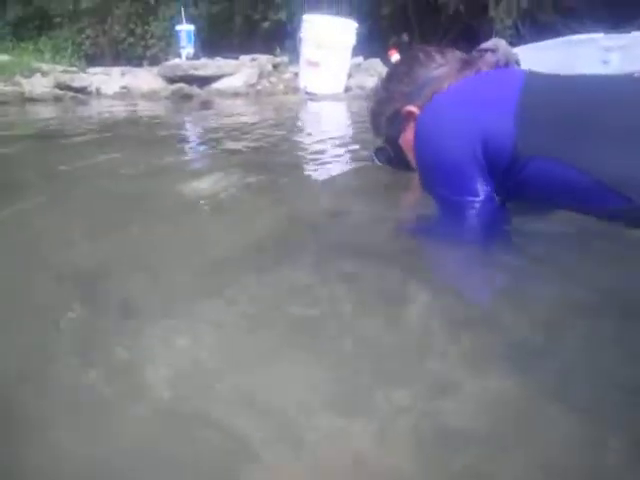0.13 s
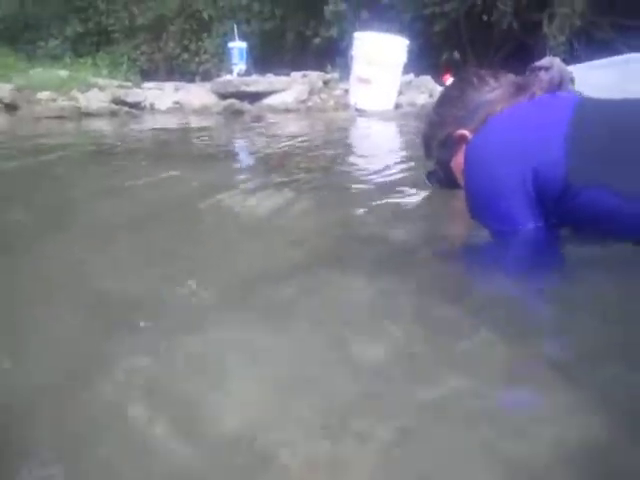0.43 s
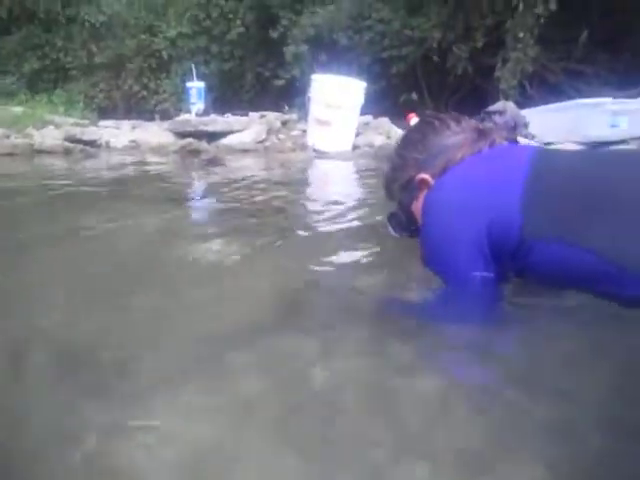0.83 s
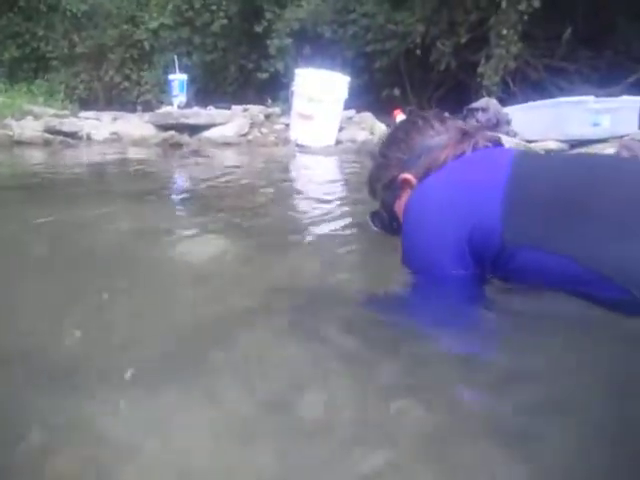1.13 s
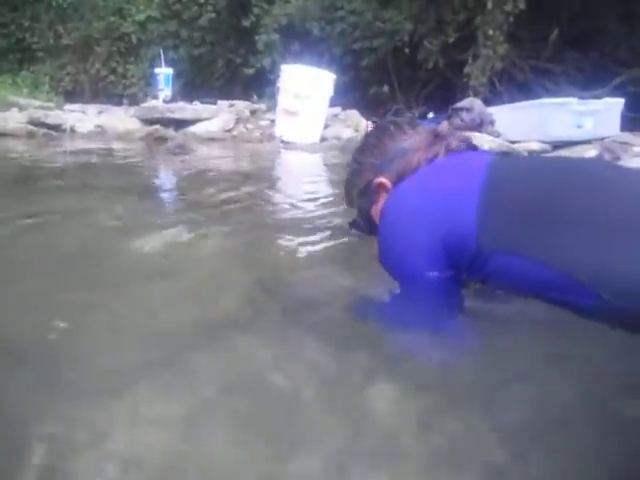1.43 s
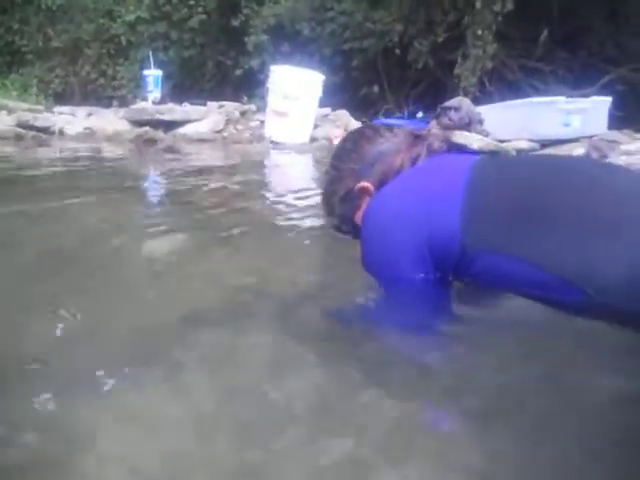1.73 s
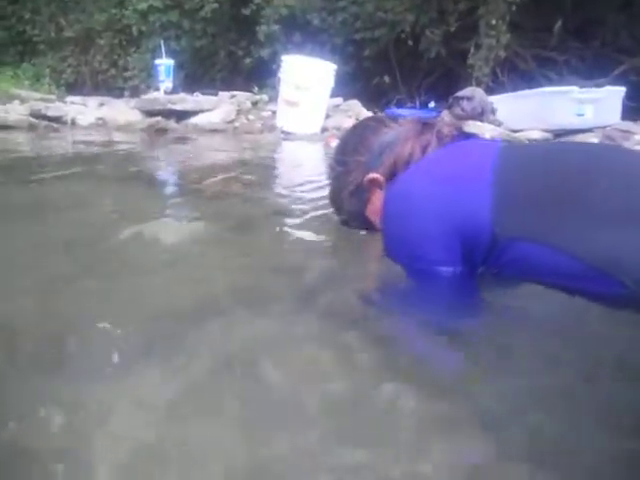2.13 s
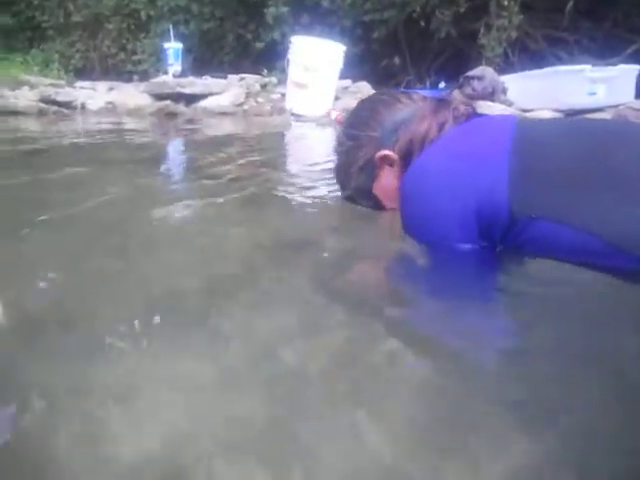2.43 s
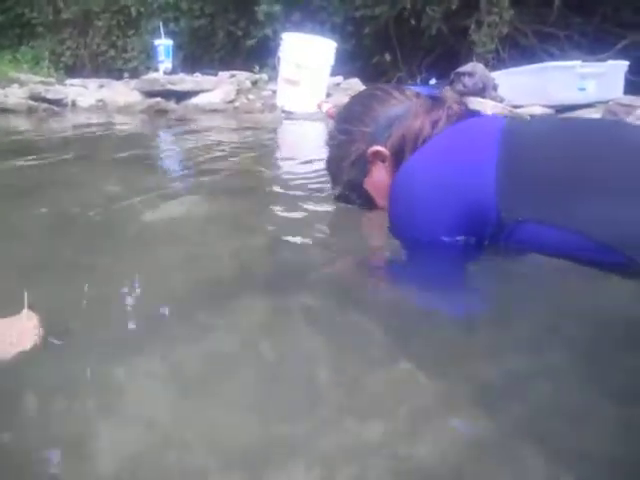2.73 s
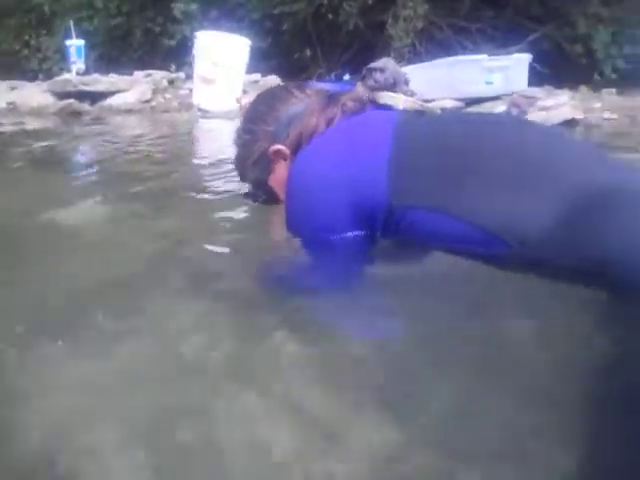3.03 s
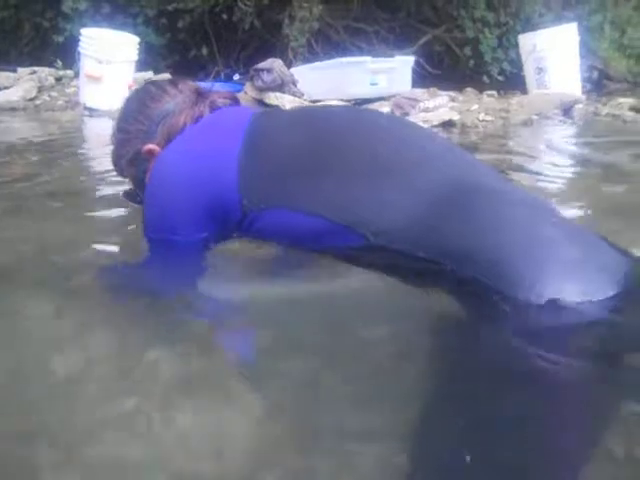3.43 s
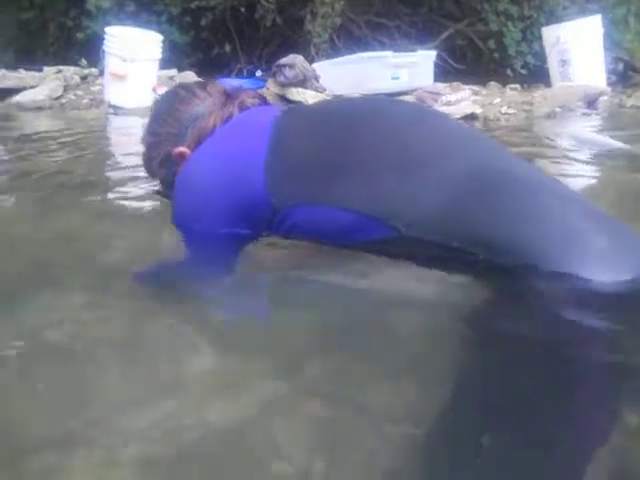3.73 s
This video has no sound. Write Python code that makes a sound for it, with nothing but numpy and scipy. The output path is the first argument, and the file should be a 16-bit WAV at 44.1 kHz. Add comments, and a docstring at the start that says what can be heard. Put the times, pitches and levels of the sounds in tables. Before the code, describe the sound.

Low rapid engine buzz with a metallic rattle grows from distant to strong outdoors. Wind buffets and little water blips cover the opening, then fade; dull, narrow-band microphone sound with one faint click near the end.

```python
"""A small one-cylinder dredge engine on a river bank, growing from faint to loud, is the main source.
Each turn excites the exhaust resonances with one pulse and modulates gas and casing noise;
damped sines ring once a turn, and the speed sags briefly now and then.
Wind adds filtered rumble and short pressure swings, most at the start.
Shallow water adds a few gulps of rising pitch and plips of decaying tone with a tick of spray."""
import sys
import numpy as np
from scipy import signal
from scipy.fft import rfft, irfft
from scipy.io import wavfile

SR = 44100
rng = np.random.default_rng(int(sys.argv[2]) if len(sys.argv) > 2 else 0)


def int16_out(signal):
    """Quantize to a 16-bit WAV file."""
    q = np.round(np.clip(np.atleast_2d(signal).T, -1, 1) * 32767)
    wavfile.write(sys.argv[1], SR, q.astype(np.int16))


N = 170667  # length [samples]

# Spectra below give a shape only: colour() brings the filtered sound to rms 1.
# Wind rumble gain: (time [s], level [dB])
WIND_LEVEL = [(0, -16.5), (.33, -18.5), (.52, -21), (.62, -25), (.86, -25.5), (1.15, -28), (1.7, -30),
              (2.3, -30.5), (2.47, -27), (2.65, -27.5), (3.3, -24.5), (3.87, -26)]
# Wind rumble spectrum: (frequency [Hz], relative density [dB per Hz])
RUMBLE_SPECTRUM = [(4, -9.5), (10, -2.5), (20, -9), (32, -15.5), (45, -14.5), (65, -24.5), (100, -30.5),
                   (200, -43.5), (400, -62), (2000, -100)]
# Separate buffets of wind: (centre time [s], length [s], peak level [dB])
WIND_BUFFETS = [(.04, 0.047, -10.5), (0.128, 0.048, -14), (0.161, 0.031, -15), (0.261, .06, -8),
                (0.321, 0.041, -10), (0.381, 0.033, -13), (0.554, .045, -20.5), (0.853, 0.054, -13),
                (1.034, .04, -20), (2.449, 0.065, -18)]
FLUTTER_DB = -35  # hiss level against its buffet [dB]
CHOKE = 0.45  # wind pressure that halves the engine sound [full scale]

# Low gulps of water: (start time [s], start frequency [Hz], length [s], peak level of the tone [dB])
WATER_GULPS = [(.218, 120.1, .042, -28.5), (.358, 85.1, 0.048, -27), (.448, 79, 0.02806, -24),
               (.72, 65, 0.027, -27.5), (1.335, 79, 0.025, -33)]
GULP_RISE, GULP_SLOSH = 0.82, 0.41  # glide over one gulp [octaves]; churning noise [rms per unit tone]
# Plips at the surface:
# (start time [s], frequency [Hz], t60 [s], peak level of the tone [dB], spray [rms per unit tone])
WATER_PLIPS = [(.104, 560, 0.025, -28, .9), (.874, 1300, .06, -34, 1.6), (1.015, 495, .1, -28, .1)]

# Brief sags of the engine speed: (centre time [s], depth [Hz])
SPEED_SAGS = [(.65, 1.3), (1.29, .5), (1.9, .4), (2.39, .5), (2.999, .53), (3.751, .63)]
TURN_HZ, SAG_S = 43.88, .05  # steady speed [turns/s]; standard deviation of a sag [s]
PUFF_AT_S = 2.4144  # time at which a turn begins with its puff [s]
WAVER_DB, WAVER_HZ = 0.28, 6  # spread of the engine level [dB]; rate, two new values a cycle [Hz]
# Gain of the engine parts: (time [s], exhaust level [dB], casing level [dB], clatter level [dB])
ENGINE_SWELL = [(0, -39.5, -47, -56.5), (.5, -40.5, -50, -56), (.8, -35, -43.5, -53.5),
                (1.15, -32.5, -41, -51), (1.5, -29.5, -37, -46.5), (1.8, -28, -34.5, -42.5),
                (2.15, -24.5, -31.5, -40), (2.6, -22.5, -28, -39.5), (3.15, -20.5, -28.5, -35.5),
                (3.87, -20.5, -27, -35.5)]

# Casing noise spectrum: (frequency [Hz], relative density [dB per Hz])
CASING_SPECTRUM = [(500, -24.5), (700, -9), (800, -2.5), (1000, -3), (1250, -2.5), (1420, 1.5),
                   (1560, -2.5), (1700, -11), (1900, -13.5), (2600, -45)]
# Clatter noise spectrum: (frequency [Hz], relative density [dB per Hz])
CLATTER_SPECTRUM = [(600, -49.5), (1300, -26.5), (1750, 1), (1900, -0.5), (2300, 0.5), (2550, -1.5),
                    (2900, -0.4), (3150, 0.5), (3400, -3.5), (3750, -2.5), (4000, -10.5), (4400, -23)]
# Levels before the swell [dB]; weight of noise power that repeats every turn [0..1]
CASING_DB, CASING_REPEAT = -1.03, 0.051
CLATTER_DB, CLATTER_REPEAT = -1.22, .16
# Valve gear ringing once a turn:
# (place in the turn [turns], ring frequency [Hz], t60 [s], rms level before the swell [dB])
VALVE_KNOCKS = [(.1, 1052, 0.06, -14.5), (.1, 1229, .06, -15), (.9, 1320, 0.062, -16),
                (.9, 1405, 0.069, -7), (.9, 1485, 0.052, -14), (0.72, 1755, 0.071, -19),
                (0.7, 2090, .04, -20), (.78, 2320, 0.038, -17.5), (.26, 2895, 0.023, -21.5)]
KNOCK_SCATTER_DB, KNOCK_JITTER_S = 2, .00005  # spread of size [dB] and of time [s]

# Exhaust resonance curve, first row not used: (multiple of the turn rate [1], relative level [dB])
EXHAUST_TONE = [(1, -10), (2, -7), (3, -10), (4, -14.5), (5, 2.5), (6, 0), (7, -7.5), (8, -6.5), (9, -5),
                (10, -6.5), (11, -3.5), (12, -3), (13, -6), (14, -12), (15, -13.5), (16, -7.5), (17, -36),
                (18, -21)]
PUFF_SCATTER_DB, PUFF_JITTER_S = 0.03, .00005  # spread of size [dB] and of time [s]
BOUNCE_S, BOUNCE_SHARE = .00835, 0.41  # round trip of a bounce [s]; amplitude kept each time [0..1]
# Gas rush spectrum: (frequency [Hz], relative density [dB per Hz])
GAS_SPECTRUM = [(60, -15.5), (150, -18.5), (230, -0.5), (350, -0.5), (500, 4), (620, 2.5), (700, 1),
                (780, -3.5), (1100, -45)]
EXHAUST_DB, GAS_DB = 1.47, -13  # puffs and gas before the swell [dB]

TOP_HZ = 4400  # upper band edge of the recorder [Hz]
# One tiny electrical click: start [s], level before the last low-pass [dB], decay constant [s]
CLICK_S, CLICK_DB, CLICK_DECAY_S = 3.387, -19.5, .0002
CLICK_TOP_HZ = 15800  # upper band edge after the click [Hz]


def undb(db):
    """Amplitude ratio from a level: twenty decibels make a factor of ten."""
    return 10 ** (np.asarray(db) / 20)


def unit(x):
    """Normalisation of the root mean square to 1."""
    return x / np.sqrt(np.mean(x ** 2) + 1e-18)


def curve(table, axis=1):
    """Gain envelope: linear interpolation of level in decibels over time."""
    rows = np.array(table)
    return undb(np.interp(np.arange(N) / SR, rows[:, 0], rows[:, axis]))


def colour(x, points):
    """Minimum-phase filtering: folding the cepstrum of the log gain makes it causal; output rms 1."""
    size = 2 * N
    hz, db = np.array(points, float).T
    log_hz = np.log(np.arange(N + 1) * SR / size + 1e-9)
    log_gain = np.log(undb(np.interp(log_hz, np.log(hz), db)))
    cepstrum = irfft(log_gain)
    cepstrum[1:N] *= 2
    cepstrum[N + 1:] = 0
    response = np.exp(rfft(cepstrum))
    led_in = np.concatenate([x[::-1], x])  # a mirrored lead-in lets the filter settle
    return unit(irfft(rfft(led_in) * response)[N:])


def add(out, start_s, sound):
    """Superposition: a short sound is summed in at its start time."""
    i = max(int(start_s * SR), 0)
    out[i:i + len(sound)] += sound[:N - i]


def damped_sine(t, hz, t60):
    """Free vibration of a damped resonator: it falls by 60 dB in t60."""
    return np.sin(2 * np.pi * hz * t) * np.exp(-np.log(1000) * t / t60)


def pulses(turns, share, scatter_db, jitter_s):
    """Quasi-periodic excitation: one impulse a turn, each a little off in size and time."""
    marks = np.arange(np.ceil(turns[0] - share), turns[-1] - share) + share
    size, late = rng.standard_normal((N // 100, 2))[:len(marks)].T
    at = np.clip(np.interp(marks, turns, np.arange(N)) + late * jitter_s * SR, 0, N - 2)
    out, i = np.zeros(N), at.astype(int)
    gain = undb(scatter_db * size)
    # two neighbouring samples share an impulse that falls between them
    out[i] += gain * (1 - at % 1)
    out[i + 1] += gain * (at % 1)
    return out


def rattle(turns, repeat, peak_at, depth):
    """Cyclic amplitude modulation of noise, part of which repeats from turn to turn."""
    size = 1024  # points in the repeated pattern of one turn
    pattern = np.interp(turns % 1 * size, np.arange(size), rng.standard_normal(size))
    noise = np.sqrt(repeat) * pattern + np.sqrt(1 - repeat) * rng.standard_normal(N)
    return noise * np.exp(depth * np.cos(2 * np.pi * (turns - peak_at)))


def wind():
    """Pressure fluctuation on a microphone: deep noise, plus single swings that carry a faint hiss."""
    out = colour(rng.standard_normal(N), RUMBLE_SPECTRUM) * curve(WIND_LEVEL)
    hiss = colour(rng.standard_normal(N), [(300, -4), (3500, 0), (4500, -14.5)])
    t = np.arange(N) / SR
    for at, length, db in WIND_BUFFETS:
        u = (t - at) / length
        out += undb(db) * np.exp(-(2 * u) ** 2) * np.cos(2 * np.pi * u)
        out += undb(db + FLUTTER_DB) * np.exp(-(np.pi * u) ** 2) * hiss
    return out


def gulps():
    """Rising resonance: each gulp is a tone gliding upward, mixed with churning noise."""
    out = np.zeros(N)
    slosh_spectrum = [(30, -6.5), (90, 0), (220, -5.5), (400, -21.5), (1500, -56)]
    slosh = colour(rng.standard_normal(N), slosh_spectrum)
    for at, hz, length, db in WATER_GULPS:
        age = np.linspace(0, 1, int(length * SR))  # 0 at the start, 1 at the end
        phase = 2 * np.pi * np.cumsum(hz * 2 ** (GULP_RISE * age)) / SR
        gulp = np.sin(phase) + GULP_SLOSH * slosh[int(at * SR):][:len(age)]
        add(out, at, undb(db) * np.sin(np.pi * age) * gulp)
    return out


def plips():
    """Damped resonance: each plip is a decaying tone with a shorter tick of spray noise."""
    out = np.zeros(N)
    t = np.arange(SR // 5) / SR
    spray = colour(rng.standard_normal(N), [(200, -6), (600, 2), (1800, 6), (4000, -27)])
    for at, hz, t60, db, share in WATER_PLIPS:
        tick = share * spray[int(at * SR):][:len(t)] * np.exp(-t / .012)
        tick = tick * np.exp(-np.log(1000) * t / t60)
        add(out, at, undb(db) * (damped_sine(t, hz, t60) + tick))
    return out


def crank():
    """Rotation angle as the integral of speed: a steady rate with short Gaussian sags, in turns."""
    t = np.arange(N) / SR
    hz = TURN_HZ - sum(depth * np.exp(-.5 * ((t - at) / SAG_S) ** 2) for at, depth in SPEED_SAGS)
    turns = np.cumsum(hz) / SR
    return turns - np.interp(PUFF_AT_S, t, turns)


def waver():
    """Slow random amplitude modulation: a gain that wanders a little about 1."""
    steps = rng.standard_normal(200)
    place = np.arange(N) / SR * 2 * WAVER_HZ
    return undb(WAVER_DB * np.interp(place, np.arange(len(steps)), steps))


def valve_knocks(turns):
    """Impulse response by convolution: the valve gear rings as a damped sine once a turn."""
    out = np.zeros(N)
    t = np.arange(SR // 10) / SR
    for share, hz, t60, db in VALVE_KNOCKS:
        hits = pulses(turns, share, KNOCK_SCATTER_DB, KNOCK_JITTER_S)
        out += undb(db) * unit(signal.fftconvolve(hits, damped_sine(t, hz, t60))[:N])
    return out


def machinery(turns):
    """Structure-borne sound: casing rattle and valve knocks, with fine clatter on top."""
    casing = rattle(turns, CASING_REPEAT, peak_at=.14, depth=0.14)
    casing = undb(CASING_DB) * colour(casing, CASING_SPECTRUM)
    clatter = rattle(turns, CLATTER_REPEAT, peak_at=.2, depth=.22)
    clatter = undb(CLATTER_DB) * colour(clatter, CLATTER_SPECTRUM)
    body = casing + valve_knocks(turns)
    return body * curve(ENGINE_SWELL, axis=2) + clatter * curve(ENGINE_SWELL, axis=3)


def bounce(puffs):
    """All-pass reverberation: bouncing to and fro spreads a puff in time, not in spectrum."""
    delay = np.exp(-1j * np.pi * np.arange(N + 1) / N * BOUNCE_S * SR)
    all_pass = (delay - BOUNCE_SHARE) / (1 - BOUNCE_SHARE * delay)
    return irfft(rfft(puffs, 2 * N) * all_pass)[:N]


def exhaust(turns):
    """Pulse-excited resonance: pressure swings up to each puff, which bounces, with a rush of gas."""
    harmonics = [(k * TURN_HZ, db) for k, db in EXHAUST_TONE[1:]]
    first_db, last_db = harmonics[0][1], harmonics[-1][1]
    # the turn rate itself lies 25 dB under its second harmonic
    tone = [(TURN_HZ, first_db - 25)] + harmonics + [(1100, last_db - 12), (2500, last_db - 45)]
    firings = pulses(turns, 0, PUFF_SCATTER_DB, PUFF_JITTER_S)
    # filtering backward in time gives a slow build and an abrupt end
    puffs = bounce(-colour(firings[::-1], tone)[::-1])
    gas = colour(rattle(turns, repeat=0, peak_at=.25, depth=.4), GAS_SPECTRUM)
    return (undb(EXHAUST_DB) * puffs + undb(GAS_DB) * gas) * curve(ENGINE_SWELL, axis=1)


def scene():
    """Superposition at one microphone, where strong wind pressure briefly chokes the engine sound."""
    gusts = wind()
    water = gulps() + plips()
    turns = crank()
    engine = (machinery(turns) + exhaust(turns)) * waver()
    heard_engine = engine / (1 + (gusts / CHOKE) ** 2)
    return (heard_engine + gusts + water)[None]


def low_pass(x, top_hz):
    """Elliptic filtering: a steep cut above the band edge."""
    return signal.sosfilt(signal.ellip(10, .2, 80, top_hz, fs=SR, output="sos"), x)


def record(dry):
    """Band limitation: a narrow-band recorder cuts the treble; a tiny click follows under a wider cut."""
    out = low_pass(dry, TOP_HZ)
    click = -undb(CLICK_DB) * np.exp(-np.arange(SR // 100) / SR / CLICK_DECAY_S)
    add(out[0], CLICK_S, click)
    return low_pass(out, CLICK_TOP_HZ)


dry = scene()
out = record(dry)
int16_out(out)
```